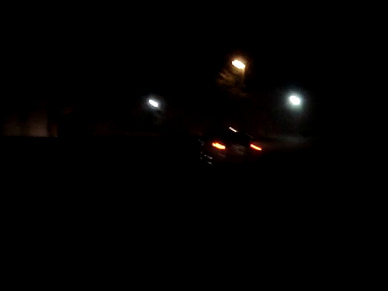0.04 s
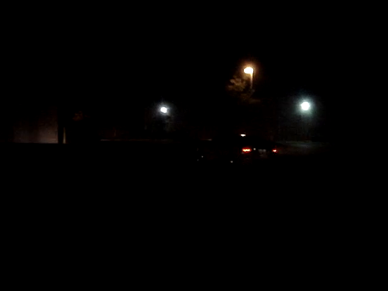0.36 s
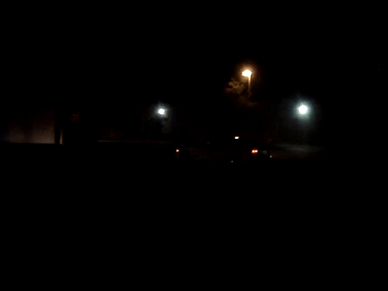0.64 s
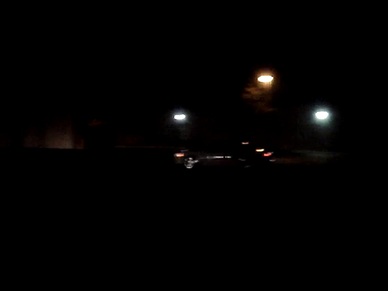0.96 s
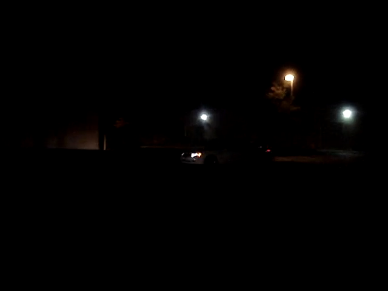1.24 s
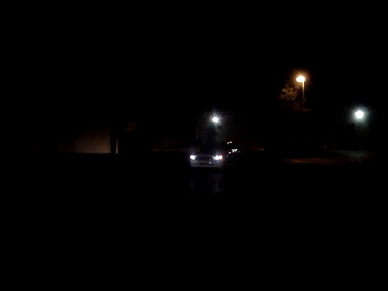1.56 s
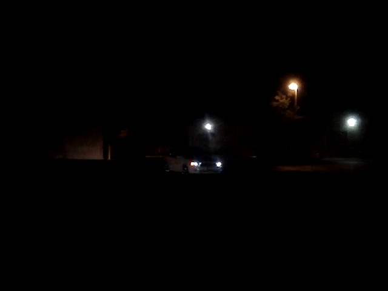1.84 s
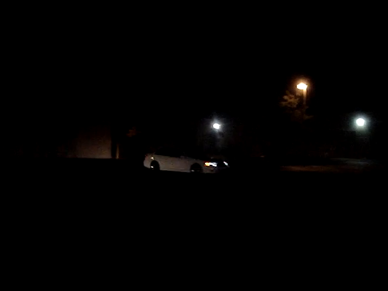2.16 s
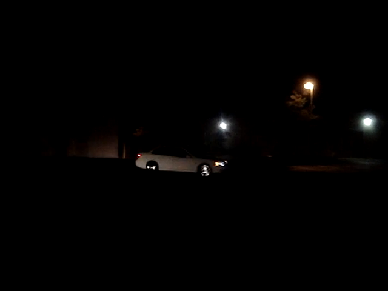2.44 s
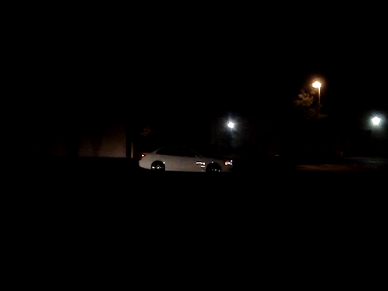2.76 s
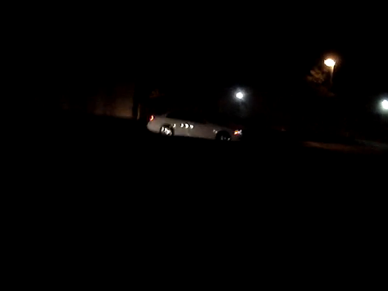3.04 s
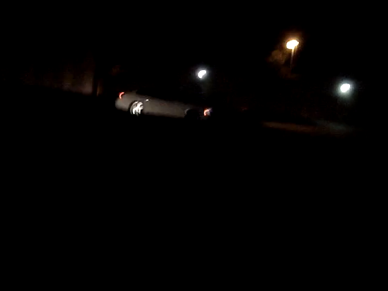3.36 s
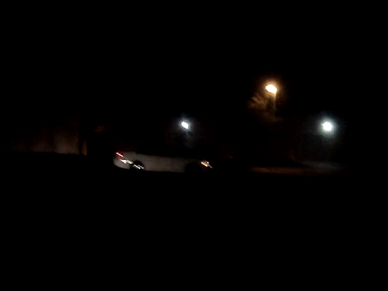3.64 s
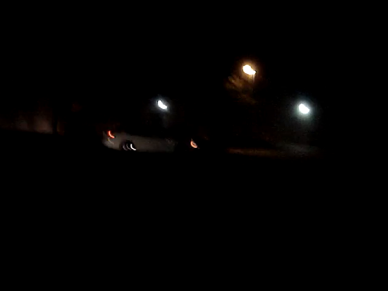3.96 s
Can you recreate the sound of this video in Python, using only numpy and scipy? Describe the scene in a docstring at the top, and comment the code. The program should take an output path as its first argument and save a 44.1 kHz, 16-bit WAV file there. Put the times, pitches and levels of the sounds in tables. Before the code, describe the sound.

A car's spinning tyres scrub and hiss some way off on open pavement, then squeal, first high, then lower. The squeal dies as road roar and a faint low engine swell, and the microphone is bumped three times.

```python
"""Car sliding in a circle

Some way off on open pavement, spinning tyres scrub and hiss, then the tread locks into stick-slip
squeals: a high one, then a lower one that a second tyre beats against. The squeal dies as the tyres
grip; road roar and a low engine swell, and the microphone is bumped three times."""
import sys
import numpy as np
from scipy import signal
from scipy.io import wavfile

SR = 44100
rng = np.random.default_rng(int(sys.argv[2]) if len(sys.argv) > 2 else 0)


def pcm_store(signal):
    """Save signal as 16-bit PCM."""
    levels = np.round(np.clip(np.atleast_2d(signal), -1, 1) * 32767)
    wavfile.write(sys.argv[1], SR, levels.astype(np.int16).T)


N = 176400
TIME = np.arange(N) / SR


def squeal(rows):
    """Tread stick-slip: a clean pitch when the blocks slip in step, a narrow rasp when they do not."""
    jitter_share, jitter_per_s = .012, 70
    flutter_db, flutter_per_s = 1.5, 34
    catch_db, catch_per_s = 6, 45
    rough_width_hz, fade_s = 53.7, .022
    overtone_min_roughness = .71  # overtones fall out of step first
    pitch_hz, level_db, roughness, second_db, third_db = in_time(rows)
    jitter = jitter_share * np.sqrt(roughness) * drift(jitter_per_s)
    phase = phase_of(pitch_hz * (1 + jitter))
    out = 0
    for k, harmonic_db in enumerate([0, second_db, third_db, second_db - 23.5], 1):
        rough = np.maximum(roughness, overtone_min_roughness * (k > 1))
        width_hz = rough_width_hz * np.sqrt(k)
        scatter = rms_one(drift(width_hz) + 1j * drift(width_hz))
        tone = (np.sqrt(1 - rough ** 2) + rough * scatter) * np.exp(1j * k * phase)
        out += tone.real * from_db(harmonic_db + flutter_db * drift(flutter_per_s))
    catches = np.maximum(drift(catch_per_s) - 1, 0)  # the tread catches, the level dips briefly
    inside_s = np.minimum(TIME - rows[0][0], rows[-1][0] - TIME)
    gate = np.clip(1 + inside_s / fade_s, 0, 1)
    return np.sqrt(2) * out * from_db(level_db - catch_db * catches) * gate


def tyre_squeals():
    """Five overlapping stick-slip voices of the tyres."""
    # squeal curves: time_s, pitch_hz, level_db, roughness (0-1), second_harmonic_db, third_harmonic_db
    high = [(1.0, 1500, -30, 0.71, -22, -35), (1.1, 1520, -26, 0.9, -19, -35),
            (1.28, 1555, -18.5, 0.62, -17, -36), (1.36, 1590, -33, .8, -20, -35),
            (1.44, 1660, -18.5, 0.42, -15, -38), (1.53, 1652, -27, 0.98, -25, -35),
            (1.58, 1640, -16.5, 0.44, -25, -39), (1.66, 1607, -16.5, .45, -14.5, -35),
            (1.73, 1553, -18, 0.63, -7, -28), (1.76, 1532, -15.5, 0.48, -7.5, -16),
            (1.8, 1560, -18, 0.38, 1.5, -14), (1.865, 1523, -15.5, 0.1, -3.5, -20),
            (1.885, 1538, -11.5, 0.54, -15, -30), (1.9, 1624, -23, .7, -13, -29),
            (1.945, 1600, -19, 0.98, -20, -37), (1.965, 1590, -29, .8, -15, -35),
            (2.16, 1560, -31, 0.62, -29, -35), (2.3, 1550, -46, .8, -25, -37)]
    low = [(0, 989, -31.5, 0.95, -5, -30), (.35, 996, -34, .9, -18, -28),
           (0.481, 1010, -25, 0.45, -18, -26), (.65, 1048, -32, 1, -20, -30),
           (.8, 1110, -27.5, 0.76, -16, -30), (1.0, 1130, -43, 0.87, -19, -29),
           (1.35, 1145, -26.5, 0.78, -24, -31), (1.699, 1063, -39.5, 0.78, -19, -35),
           (2.08, 1030, -32.5, 0.57, -17, -32), (2.22, 1000, -26, 0.93, -20, -30),
           (2.29, 1035, -17, 1, -21, -33), (2.36, 1085, -24, 0.98, -16, -30),
           (2.44, 1105, -18.5, 0.87, -14, -31), (2.48, 1030, -12.5, 0.16, -41, -42),
           (2.52, 1040, -13, 0.21, -34, -39), (2.554, 1080, -15.5, 0.26, -26, -34),
           (2.585, 1058, -23, 0.82, -10.5, -32), (2.61, 1045, -13, 0.22, -24.5, -34),
           (2.68, 1037, -17, 0.38, -18.5, -19.5), (2.82, 1037, -19, 0.38, -12, -29),
           (2.95, 1061, -16.5, 0.48, -18, -36), (3.02, 1061, -19.5, 0.4, -16, -34),
           (3.1, 1068, -24.5, 0.35, -17, -34), (3.15, 1044, -34, 0.91, -13, -30),
           (3.4, 1039, -39.5, 0.73, -11, -32), (4, 1052, -38, 0.98, -22, -26)]
    second_tyre = [(2.72, 1223, -53, .4, -17, -35), (2.75, 1225, -26, .3, -18, -35),
                   (2.84, 1207, -27, 0.44, -17, -38), (2.92, 1190, -25, .3, -22, -39),
                   (2.99, 1269, -28.5, .6, -32, -36), (3.07, 1295, -38, 0.78, -21, -33),
                   (3.15, 1334, -42, 0.91, -20, -35), (3.23, 1424, -34.5, 0.67, -32, -35),
                   (3.3, 1438, -48, 1, -22, -35), (3.42, 1460, -38.5, .6, -24, -35),
                   (3.7, 1438, -46, 0.81, -24, -35)]
    moan = [(1.14, 511, -44.5, .5, -9, -20), (1.24, 610, -38, 0.32, -16, -20),
            (1.36, 662, -32.5, 0.14, -1, -22), (1.5, 672, -49, 0.54, -10, -21)]
    opening_chirp = [(0, 1175, -34, 1, -11, -30), (.25, 1100, -30.5, 0.8, -24, -31),
                     (.38, 1180, -29, 0.65, -16, -30), (.58, 1219, -39, 0.69, -14, -30),
                     (.75, 1318, -43, .8, -16, -30)]
    return sum(squeal(rows) for rows in (high, low, second_tyre, moan, opening_chirp))


def tyre_scrub():
    """Coarse scrub of rubber on asphalt."""
    # envelope: time_s, level_db
    levels = [(0, -21), (.63, -19), (1.15, -20), (1.4, -19.5), (1.6, -22), (1.9, -27), (2.1, -24),
              (2.37, -24.5), (2.6, -32), (2.95, -42.5), (3.2, -54), (4, -44)]
    # spectrum: freq_hz, density_db
    colour = [(100, -43.5), (220, -24.5), (380, -26.5), (560, -8.5), (690, -5), (820, -7), (1100, 3.5),
              (1400, -0.5), (2200, -1), (2750, -5), (3300, -4), (4500, -7.5), (6300, -14.5), (7700, -20.5),
              (10000, -18.5)]
    return friction(levels, colour)


def tread_hiss(width_hz=1020, grit_db=2.67):
    """Narrow, flickering sizzle of the spinning tread; its centre shifts as the car turns."""
    # treble band: time_s, level_db, centre_hz
    curve = [(0, -31, 9000), (.6, -34.5, 8980), (1.2, -39, 9040), (1.9, -47, 9000), (2.35, -43.5, 9510),
             (2.6, -53, 9380), (3.1, -56.5, 9280), (3.3, -63, 9400), (3.6, -62, 8470), (3.75, -49, 8300),
             (4, -48, 8200)]
    level_db, centre_hz = in_time(curve)
    real, imaginary = low_pass(rng.standard_normal((2, N)), width_hz / 2)
    band = ((real + 1j * imaginary) * np.exp(1j * phase_of(centre_hz))).real
    return from_db(level_db + grit_db * drift(60)) * rms_one(band)


def tread_whine(start_db=-34.5, fade_db_per_s=21):
    """Thin, fading whine of the fast-spinning tread."""
    return from_db(start_db - fade_db_per_s * TIME) * band_noise(low_hz=4030, high_hz=4400)


def tyre_spray():
    """Bright spray of noise as the tyres swing side-on."""
    # envelope: time_s, level_db
    levels = [(0, -35.5), (1.2, -62), (1.9, -41.5), (2.3, -35.5), (2.44, -36), (2.52, -42.5), (2.7, -44.5),
              (3.0, -51.5), (3.25, -56), (4, -62)]
    # spectrum: freq_hz, density_db
    colour = [(2500, -18.5), (4500, -11.5), (6100, 30.5), (7200, 2.5), (8200, -52), (10000, -18.5)]
    return friction(levels, colour)


def road_roar():
    """Rolling roar, swelling as the car nears."""
    # envelope: time_s, level_db
    levels = [(0, -57), (2.3, -39), (3.0, -36.5), (3.3, -35.5), (3.55, -31.5), (3.8, -28), (4, -25.5)]
    # spectrum: freq_hz, density_db
    colour = [(40, -23.5), (150, -13), (420, -12), (530, -5.5), (690, 0), (850, -14), (1100, 1), (1400, -4),
              (1750, -7), (2800, -11), (3500, -8.5), (5200, -19.5), (8300, -24.5), (10000, -36.5)]
    return friction(levels, colour)


def echoes(x, count=24, level_db=-11, fade_db_per_s=90):
    """Dull reflections from the walls and trees around the lot."""
    delays_s = np.linspace(.012, .22, count) * rng.uniform(.85, 1.15, count)
    gains = from_db(-fade_db_per_s * delays_s) * rng.choice([-1, 1], count)
    out = np.zeros(N)
    for lag, gain in zip((delays_s * SR).astype(int), gains / np.linalg.norm(gains)):
        out[lag:] += gain * x[:N - lag]
    return from_db(level_db) * low_pass(out, cutoff_hz=2800)


def engine(wobble_share=.0089, flutter_db=3):
    """Low, uneven exhaust orders."""
    # engine run: time_s, firing_hz, level_db
    curve = [(0, 112.9, -67.5), (.9, 106.2, -62), (1.3, 111, -70.5), (2.7, 99.2, -66), (3.15, 95.3, -57),
             (3.35, 95.2, -54.5), (4, 93.6, -52)]
    # exhaust orders: firing_multiple, gain_db
    orders = [(1, -2.5), (1.33, -16), (2, -7.5), (3, -3), (4, -9.5)]
    firing_hz, level_db = in_time(curve)
    phase = phase_of(firing_hz * (1 + wobble_share * drift(8.25)))
    return np.sqrt(2) * sum(np.sin(k * phase) * from_db(level_db + gain_db + flutter_db * drift(13))
                            for k, gain_db in orders)


def drone(wobble_share=.04, flutter_db=2.5):
    """Brief, uneven low tone, rising as the tyres find grip."""
    # rising tone: time_s, pitch_hz, level_db
    curve = [(2.72, 135.7, -74), (2.85, 149.6, -54), (2.96, 170, -53), (3.03, 175, -70)]
    pitch_hz, level_db = in_time(curve)
    gain = from_db(level_db + flutter_db * drift(25))
    phase = phase_of(pitch_hz * (1 + wobble_share * drift(30)))
    return np.sqrt(2) * gain * np.sin(phase)


def microphone_bumps(thud_decay_s=.005, tick_decay_s=.0022, edge_ratio=1.85):
    """Each bump is a dry tick and a heavily damped thud of the casing."""
    # bumps: start_s, thud_hz, thud_db, tick_db
    hits = [(3.025, 337, -30.5, -18.5), (3.119, 700, -43, -23), (3.636, 115, -32, -22.5)]
    out = np.zeros(N)
    for start_s, thud_hz, thud_db, tick_db in hits:
        age_s = np.maximum(TIME - start_s, 0)
        thud = band_noise(thud_hz / edge_ratio, thud_hz * edge_ratio)
        out += from_db(thud_db) * thud * np.sqrt(age_s / thud_decay_s) * np.exp(1 - age_s / thud_decay_s)
        tick = rms_one(low_pass(rng.standard_normal(N), cutoff_hz=2800))
        out += from_db(tick_db) * tick * (age_s > 0) * np.exp(-age_s / tick_decay_s)
    return out


def finger_rustle():
    """Fingers rub the casing around the first two bumps."""
    # envelope: time_s, level_db
    levels = [(3.01, -90), (3.03, -37), (3.06, -48), (3.1, -36), (3.135, -43), (3.16, -57), (3.26, -90)]
    # spectrum: freq_hz, density_db
    colour = [(150, -5), (600, -2), (2500, -1.5), (5000, -4.5), (10000, -10)]
    return friction(levels, colour)


def wind(lump_db=3.5, lumps_per_s=14):
    """Faint, lumpy rumble of air at the microphone."""
    # envelope: time_s, level_db
    levels = [(0, -54), (.3, -68), (.6, -76), (1.8, -66), (2.1, -81), (3.0, -75), (4, -67)]
    # spectrum: freq_hz, density_db
    colour = [(20, -1), (40, -1.5), (70, -13), (110, -16)]
    level_db, = in_time(levels)
    return from_db(level_db + lump_db * drift(lumps_per_s)) * coloured_noise(colour)


def night_air(level_db=-64):
    """Low outdoor hush."""
    # spectrum: freq_hz, density_db
    colour = [(20, -3.5), (45, -8), (80, -5), (200, -2.5), (500, -11)]
    return from_db(level_db) * coloured_noise(colour)


def friction(levels, colour, grit_db=1.0, grit_per_s=56):
    """One surface dragged over another: coloured noise with a fast, uneven grain."""
    level_db, = in_time(levels)
    return from_db(level_db + grit_db * drift(grit_per_s)) * coloured_noise(colour)


def coloured_noise(colour, flicker_db=1.0, flicker_per_s=9.2):
    """Quarter-octave noise bands, each flickering by itself; rms 1."""
    edges_hz = 20 * 2 ** np.arange(0, 9.3, .25)
    freq_hz, density_db = np.transpose(colour)
    out, white = np.zeros(N), rng.standard_normal((2, N))
    for k, (low_hz, high_hz) in enumerate(zip(edges_hz, edges_hz[1:])):
        if high_hz > freq_hz[0] and low_hz < freq_hz[-1]:
            sos = signal.butter(3, [low_hz, high_hz], "band", fs=SR, output="sos")
            band = signal.sosfilt(sos, white[k % 2])
            band_db = np.interp(np.log(low_hz * high_hz) / 2, np.log(freq_hz), density_db)
            out += band * from_db(band_db + flicker_db * drift(flicker_per_s))
    return rms_one(out)


def band_noise(low_hz, high_hz):
    """Noise in one band; rms 1."""
    sos = signal.butter(2, [low_hz, high_hz], "band", fs=SR, output="sos")
    return rms_one(signal.sosfilt(sos, rng.standard_normal(N)))


def drift(rate_per_s):
    """Smooth random wander; rms 1."""
    hop, settle_steps = 20, 2000
    pole = np.exp(-2 * np.pi * hop * rate_per_s / SR)
    white = rng.standard_normal(N // hop + settle_steps + 2)
    slow = signal.lfilter([1], [1, -2 * pole, pole * pole], white)[settle_steps:]
    return np.interp(np.arange(N) / hop, np.arange(len(slow)), rms_one(slow))


def low_pass(x, cutoff_hz):
    """Gentle treble loss."""
    return signal.sosfilt(signal.butter(2, cutoff_hz, fs=SR, output="sos"), x)


def in_time(rows):
    """Each column after time_s, interpolated to every sample."""
    time_s, *columns = np.transpose(rows)
    return [np.interp(TIME, time_s, column) for column in columns]


def phase_of(freq_hz):
    """Running phase in radians."""
    return 2 * np.pi * np.cumsum(freq_hz) / SR


def from_db(db):
    """Decibels to gain."""
    return 10 ** (np.asarray(db) / 20)


def rms_one(x):
    """Scale to rms 1."""
    return x / np.sqrt(np.mean(np.abs(x) ** 2) + 1e-20)


def scene():
    """Car, microphone handling and night air, alike in both channels."""
    squeals = tyre_squeals()
    tyre_noise = tyre_scrub() + tread_hiss() + tread_whine() + tyre_spray() + road_roar()
    car = squeals + echoes(squeals) + tyre_noise + engine() + drone()
    mono = car + microphone_bumps() + finger_rustle() + wind() + night_air()
    return np.stack([mono, mono])


def record(dry):
    """Steep treble cut."""
    cutoff_hz = 10050
    return signal.sosfilt(signal.ellip(14, .2, 80, cutoff_hz, fs=SR, output="sos"), dry)


dry = scene()
out = record(dry)
pcm_store(out)
```